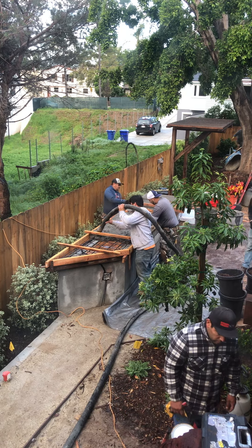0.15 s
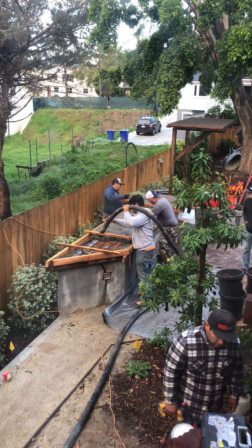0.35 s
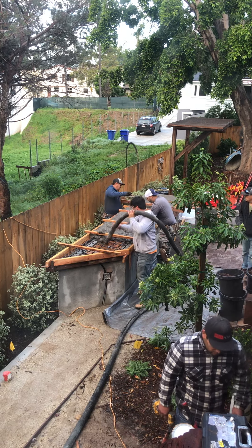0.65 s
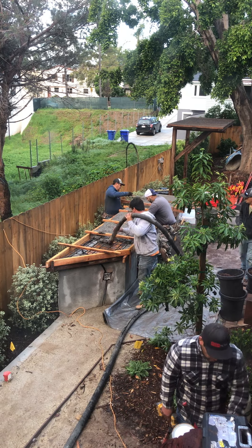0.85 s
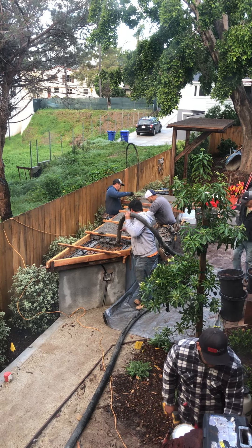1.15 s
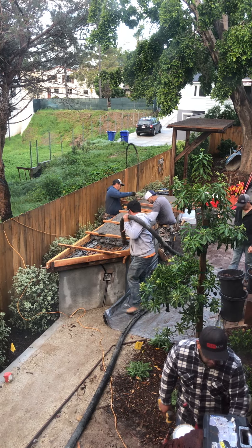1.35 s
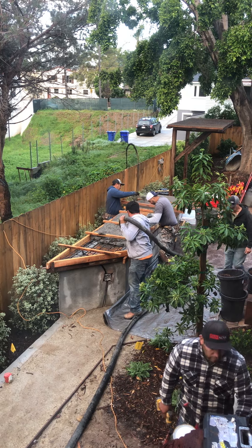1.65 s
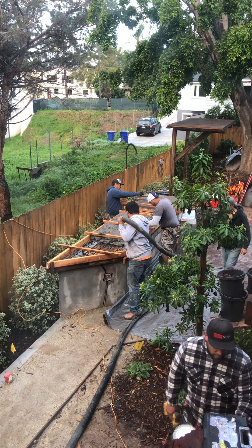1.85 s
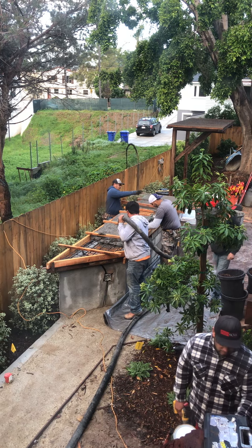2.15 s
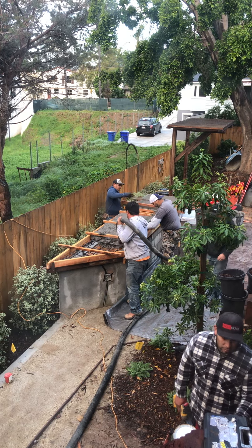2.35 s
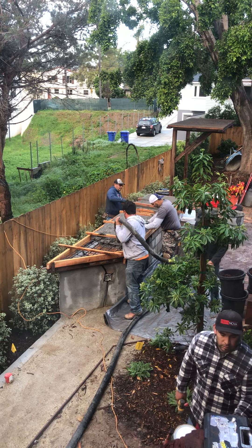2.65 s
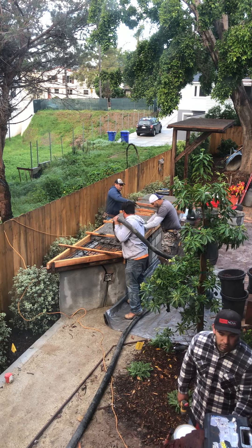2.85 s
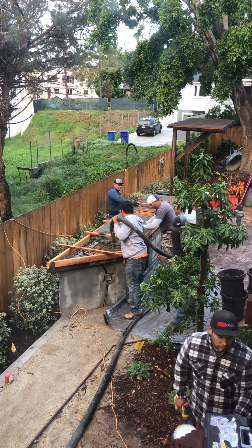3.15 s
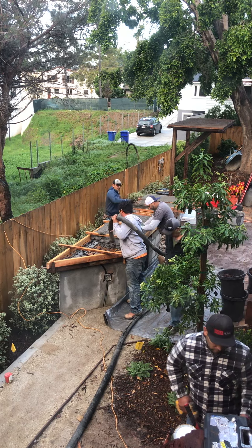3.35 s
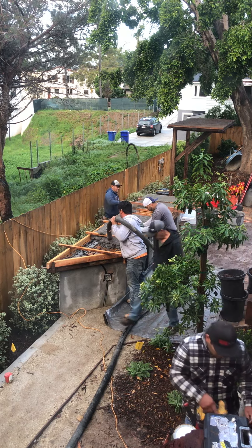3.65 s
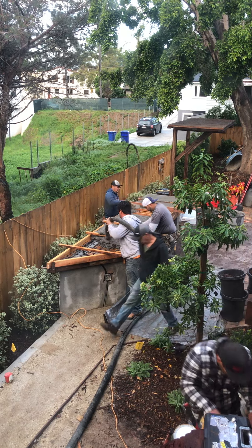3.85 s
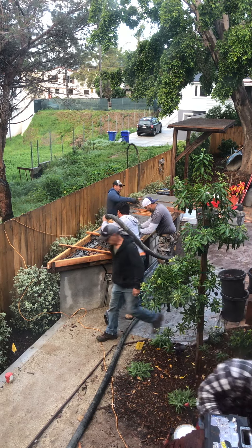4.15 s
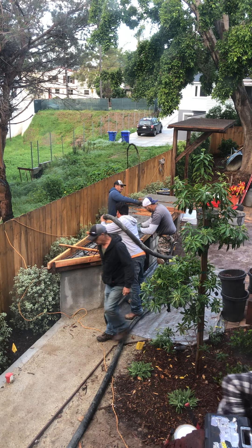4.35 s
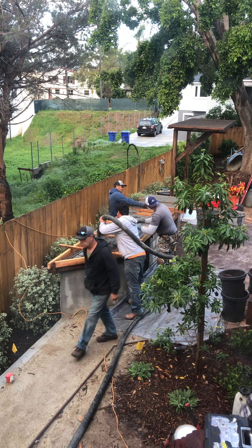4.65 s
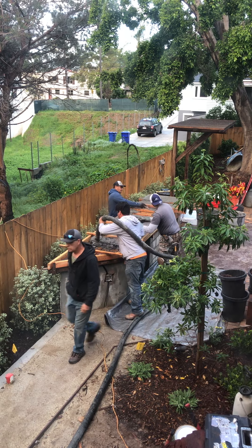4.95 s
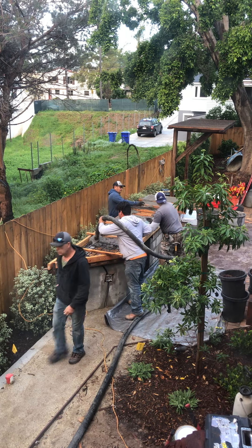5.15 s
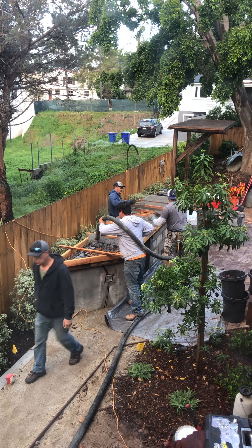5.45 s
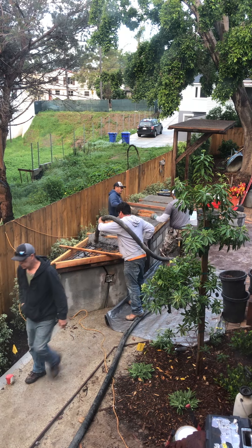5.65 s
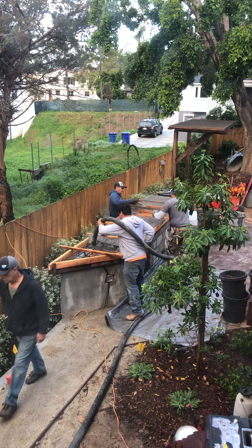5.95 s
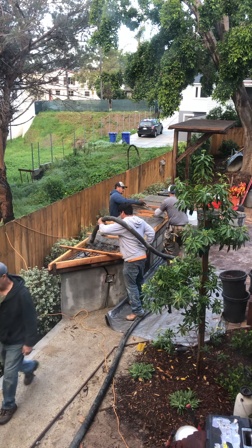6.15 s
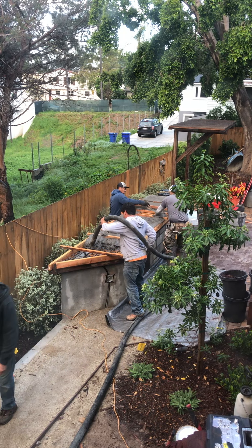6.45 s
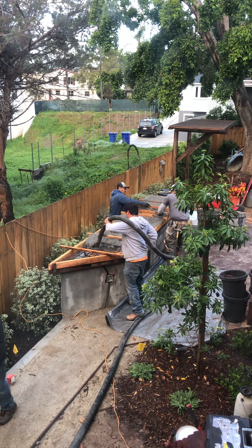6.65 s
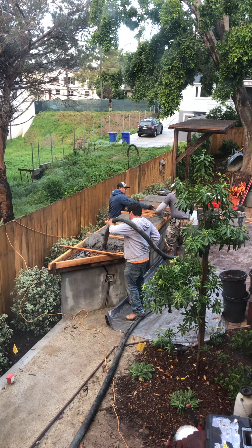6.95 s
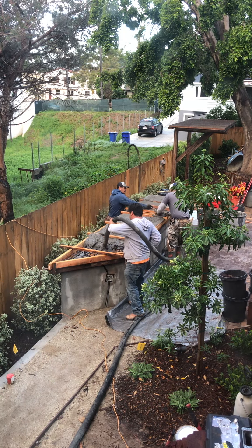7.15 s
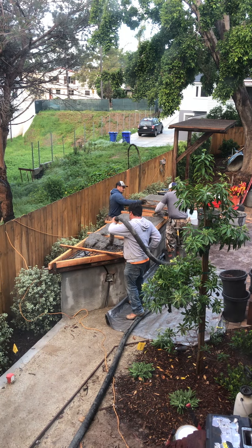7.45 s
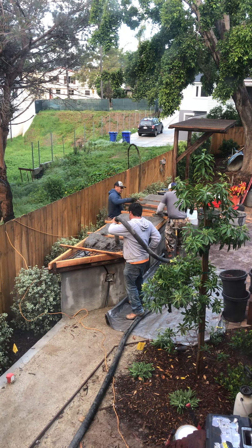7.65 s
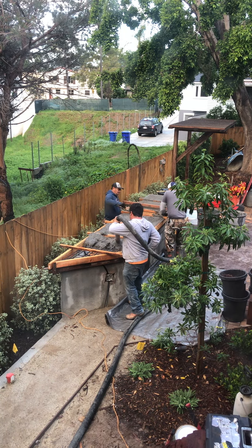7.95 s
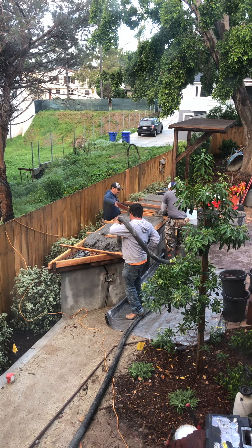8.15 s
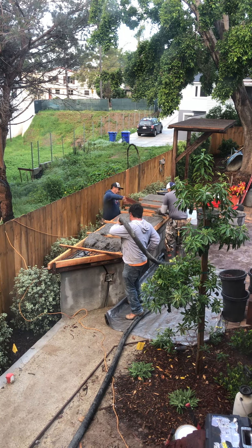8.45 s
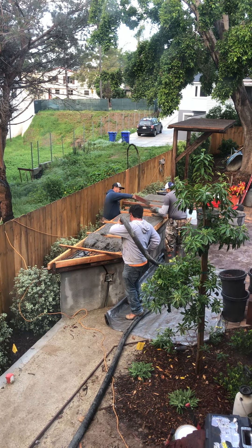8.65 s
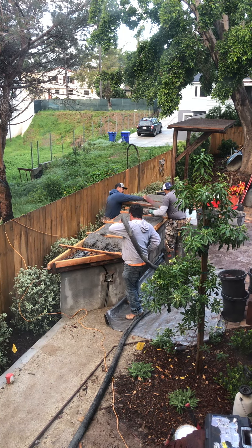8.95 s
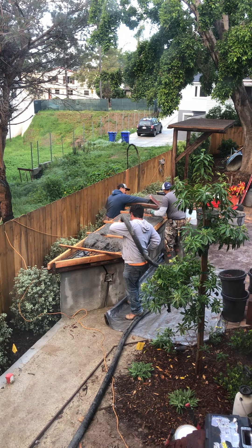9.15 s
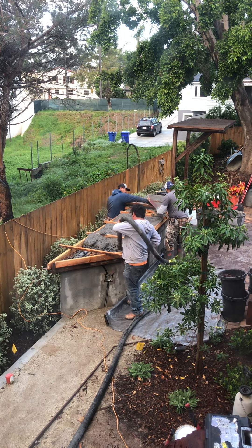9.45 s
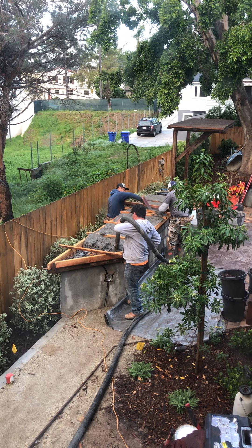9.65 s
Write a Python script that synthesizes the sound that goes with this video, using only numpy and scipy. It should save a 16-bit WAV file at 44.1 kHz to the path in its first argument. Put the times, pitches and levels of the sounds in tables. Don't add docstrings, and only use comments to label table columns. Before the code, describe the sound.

In a garden work site, a diesel concrete pump drones loudly with a second machine idling slightly lower, making a fast beating throb. Every 1.6 seconds the engine briefly races, the boom swells, a hydraulic whine rises and the clatter thins, then it settles. Loose metal chinks constantly. Tools knock and scuff early, and a steel rod bounces around three seconds. Phone microphone, mono, faint hiss.

```python
import sys
import numpy as np
from scipy import signal
from scipy.fft import rfft, irfft
from scipy.io import wavfile
from scipy.ndimage import uniform_filter1d, map_coordinates

SR = 44100
rng = np.random.default_rng(int(sys.argv[2]) if len(sys.argv) > 2 else 0)


def bounce(signal):
    frames = np.transpose(np.atleast_2d(signal))
    limited = np.clip(frames, -1, 1)
    pcm = np.round(limited * 32767).astype(np.int16)
    wavfile.write(sys.argv[1], SR, pcm)


def nominal_scale(level):
    x = np.asarray(level, float) / 20
    return 10 ** x


N = 432621

# start_s, settled_firing_hz, overspeed_hz
VALVE_CHANGES = [
    (-1.05, 74.52, 3),
    (.536, 74.917, 2.798),
    (2.13, 74.451, 3.065),
    (3.729, 74.929, 2.759),
    (5.327, 74.516, 3.014),
    (6.912, 74.915, 2.862),
    (8.509, 74.477, 3.005),
]
# lag_s, rise_s, fall_s, change_db
CLATTER_THINNING = [(0.15, 0.21, 0.38, -6), (0.097, 0.32, 0.49, -5)]


def unit(x):
    return x / np.sqrt(np.mean(x ** 2) + 1e-20)


def curves(rows):
    s, *columns = np.transpose(rows)
    return [np.interp(np.arange(N) / SR, s, column) for column in columns]


def wobble(rate):
    knots = rng.standard_normal(int(N * rate / SR) + 4)
    return map_coordinates(knots, [np.arange(N) * rate / SR])


def rush(spectrum, patchy_db):
    z = signal.stft(rng.standard_normal(N), nperseg=512)[2]
    patches = uniform_filter1d(rng.standard_normal(z.shape), size=7, axis=0)
    patches = uniform_filter1d(patches, size=14, axis=1)
    noise = signal.istft(z * nominal_scale(patchy_db * unit(patches)), nperseg=512)[1][:N]
    hz, db = np.transpose(spectrum)
    colour = nominal_scale(np.interp(np.log(np.fft.rfftfreq(N, 1 / SR) + 1), np.log(hz + 1), db))
    return unit(irfft(rfft(noise) * colour, N))


def tone(db, turns):
    return np.sqrt(2) * nominal_scale(db) * np.cos(2 * np.pi * turns)


def add(track, s, sound):
    part = track[round(s * SR):][:len(sound)]
    part += sound[:len(part)]


def swell(s, rise, fall):
    u = np.clip(s / rise, 0, 1)
    return u * u * (3 - 2 * u) * np.exp(-np.maximum(s - rise, 0) / fall)


def stroke_db(rows, extra_db=0):
    t = np.arange(N) / SR
    extra_db = extra_db + np.zeros(len(VALVE_CHANGES))
    total_db = np.zeros(N)
    for k, (start, _, _) in enumerate(VALVE_CHANGES):
        lag, rise, fall, change_db = rows[k % 2]
        total_db += (change_db + extra_db[k]) * swell(t - start - lag, rise, fall)
    return total_db


def pump_speed():
    race_s, settle_s = .265, .252
    t = np.arange(N) / SR
    starts, settled_hz, overspeed_hz = np.transpose(VALVE_CHANGES)
    k = np.searchsorted(starts, t, "right") - 1
    since = t - starts[k]
    before_hz = settled_hz[np.maximum(k - 1, 0)]
    glide_hz = (settled_hz[k] - before_hz) * np.clip(since / race_s, 0, 1)
    return before_hz + glide_hz + overspeed_hz[k] * swell(since, race_s, settle_s)


def exhaust(boom_db, firings, overspeed, surge, sway):
    boom = tone(boom_db, firings) + tone(-55 + 1.2 * sway[1], 2 * firings)
    return boom + overspeed * tone(-46.5, 2 * firings - .5 + .17 * surge)


def engine_orders(cycles, racing, overspeed, sway):
    # multiple_of_cycle, loaded_db, racing_db
    orders = [(3, -62, -57), (5, -65, -66), (6, -69, -79), (7, -56, -55), (9, -66.5, -92), (10, -74, -81),
              (11, -79, -67.5), (12, -72.5, -73), (13, -78.5, -91), (14, -65.5, -62), (15, -77, -73),
              (16, -86, -73.5), (17, -74, -68), (19, -76.5, -78), (20, -66.5, -77.5), (21, -80, -73),
              (22, -78, -80), (23, -76, -86), (28, -85, -75.5), (32, -68, -74), (33, -76, -76),
              (35, -80, -80.5), (37, -98, -77), (38, -84, -81), (40, -76, -101), (41, -72, -84),
              (43, -76.5, -83), (47, -75.5, -101), (52, -77, -92), (85.4, -80, -87)]
    out = tone(-80 + 9 * racing + 2.1 * sway[2], 2 * cycles)
    freed = np.maximum(racing, overspeed)
    for i, (multiple, load_db, race_db) in enumerate(orders):
        level_db = load_db + freed * (race_db - load_db) + 1.2 * sway[i % 6]
        drift = 0.011 * sway[(i + 3) % 6]
        out += tone(level_db, round(multiple) * cycles + rng.random() + drift)
    return out


def hydraulic_whine(cycles):
    # lag_s, rise_s, fall_s, change_db
    whine_swell = [(.17, 0.19, 0.16, 12.5), (.27, 0.17, 0.18, 8.5)]
    whine_extra = [0, 0, -0.21, 0.067, 0.38, 0, 2.2]
    # multiple_of_whine, level_db, resonance_hz, width_hz
    overtones = [(2, -66.5, 690, 13), (6, -78, 2012, 14), (6, -80, 2070, 14), (7, -77, 2376, 18)]
    steadiness = np.clip(1 - stroke_db(whine_swell) / 8, .2, 1)
    whine_db = -67.5 + stroke_db(whine_swell, whine_extra) + 1.5 * wobble(4.4) * steadiness
    pistons = 18 * cycles
    piston_hz = np.gradient(pistons) * SR
    rising = np.gradient(piston_hz) > 0
    out = tone(whine_db, pistons)
    for multiple, db, hz, width in overtones:
        near = 1 / (1 + ((multiple * piston_hz - hz) / width) ** 2)
        near *= np.where(rising, .45, 1)
        near = uniform_filter1d(near, size=2000)
        out += near * tone(db + 2.5 * wobble(6), multiple * pistons)
    return out


def clatter(firings, cycles):
    # pitch_hz, density_db (per Hz)
    roar_spectrum = [(220, -38), (380, -2.5), (398, -16), (481, -6.5), (554, -9), (575, -10), (591, -5.5),
                     (638, -6.5), (748, -2.5), (1490, -10), (1630, -9), (1920, -14.5), (2030, -10),
                     (2770, -9), (3600, -22), (4680, -51), (7920, -120)]
    # pitch_hz, density_db (per Hz)
    hiss_spectrum = [(1760, -20), (3000, -8.5), (3520, -5.5), (3770, -4.5), (4070, -4.5), (5150, -5.5),
                     (6470, -7), (8700, -14), (9300, -18), (11100, -22.5), (15700, -29)]
    top_leads_s, top_from_hz = .07, 7500
    clatter_db = -67 + stroke_db(CLATTER_THINNING)
    chop = 1 + 0.032 * np.cos(2 * np.pi * firings)
    chop += 0.048 * np.cos(np.pi * firings) + 0.017 * np.cos(2 * np.pi * cycles)
    shared_db = 0.13 * wobble(3.5)
    roar_db = -60 + 0.68 * (clatter_db + 67) + shared_db
    roar = nominal_scale(roar_db) * chop * rush(roar_spectrum, patchy_db=0.76)
    hiss = chop ** 0.45 * rush(hiss_spectrum, patchy_db=0.77)
    hz = np.fft.rfftfreq(N, 1 / SR) + 1
    top = irfft(rfft(hiss) / (1 + (top_from_hz / hz) ** 8), N)
    early_db = np.interp(np.arange(N) + top_leads_s * SR, np.arange(N), clatter_db)
    return roar + nominal_scale(3.5 + shared_db) * (nominal_scale(clatter_db) * (hiss - top) + nominal_scale(early_db) * top)


def rumble(racing):
    # pitch_hz, density_db (per Hz)
    rumble_spectrum = [(22, -48), (32, -27), (42, -27), (55, -3.5), (85, -10.5), (110, -4.5), (160, -3.5),
                       (190, -9.5), (230, -9.5), (300, -13.5), (450, -21.5), (600, -24.5), (900, -120)]
    level_db = -56.0 + 0.81 * racing + 0.66 * wobble(2.8)
    return nominal_scale(level_db) * rush(rumble_spectrum, patchy_db=.5)


def pump():
    # lag_s, rise_s, fall_s, change_db
    boom_swell = [(.04, .27, .19, 7), (.05, .29, 0.25, 7)]
    boom_db = -40.5 + stroke_db(boom_swell) + .4 * wobble(4)
    speed = pump_speed()
    firings = np.cumsum(speed) / SR + .442
    racing = np.clip((boom_db + 40.0) / 3, 0, 1)
    overspeed = np.clip((speed - 75.35) / 2.2, 0, 1)
    lag = 1 / (.2 * SR)
    surge = signal.lfilter([lag], [1, lag - 1], np.clip(speed - 75.1, 0, 3))
    cycles = (firings - .07 * surge) / 4
    sway = [wobble(3.146) for _ in range(6)]
    tones = exhaust(boom_db, firings, overspeed, surge, sway) + engine_orders(cycles, racing, overspeed, sway)
    return tones + hydraulic_whine(cycles) + clatter(firings, cycles) + rumble(racing)


def idler():
    # start_s, exhaust_db, fan_db
    levels = [(0, -51, -80), (.9, -50, -63), (3.6, -51, -63), (4.8, -48, -63), (6.1, -50.5, -62),
              (7.5, -48.5, -65.5), (8.2, -51, -62), (9.1, -50.5, -73), (9.81, -53, -74)]
    # start_s, firing_hz
    idle_speed = [(0.0, 70.44), (0.65, 69.96), (1.31, 69.62), (1.96, 69.58), (2.62, 69.9), (3.27, 69.7),
                  (3.92, 69.94), (4.58, 68.53), (5.23, 69.46), (5.89, 69.99), (6.54, 69.77), (7.19, 68.76),
                  (7.85, 70.77), (8.5, 71.03), (9.16, 71.41), (9.81, 70.61)]
    exhaust_db, fan_db = curves(levels)
    firings = np.cumsum(curves(idle_speed)[0]) / SR + .015
    uneven = tone(exhaust_db - 18.5 + 3.8 * wobble(4.2), 1.5 * firings)
    fan = tone(fan_db + 1.6 * wobble(2.7), 3.467 * firings)
    return tone(exhaust_db, firings) + uneven + fan


def chinks(count, hz, db):
    out, t = np.zeros(N), np.arange(SR // 40) / SR
    envelope = nominal_scale(-60 * t / 0.012) * (1 - np.exp(-t / .002))
    for when, pitch, size in rng.random((count, 3)):
        ring = np.sin(2 * np.pi * hz * (0.97 + .24 * pitch) * t) * envelope
        add(out, when * N / SR, nominal_scale(db - 2.5 * np.log(size + .08)) * ring)
    return out * nominal_scale(1.3 * (stroke_db(CLATTER_THINNING) - 2.0) + 2.5 * wobble(6.2))


def scuffs():
    # peak_s, level_db (rms), length_s, centre_hz
    scrapes = [(.009, -66, .003, 12000), (.1125, -63, 0.0033, 3500), (.1125, -66, .003, 9000),
               (.131, -74, .003, 15000), (.151, -74, .004, 12000), (.272, -58, 0.015, 4000),
               (.273, -71, .014, 12000), (.354, -64, .003, 8000), (.413, -58, .002, 14000),
               (1.13, -64, 0.051, 2780), (1.6, -77, .04, 11000), (1.602, -54.5, 0.13, 228),
               (2.39, -56.5, 0.044, 845), (2.391, -58.5, 0.048, 2500), (2.389, -60, .012, 850),
               (2.375, -79, .09, 10000), (1.125, -66, 0.1, 4600), (1.125, -75, .09, 7500),
               (1.578, -66, 0.088, 2800), (0.439, -65, 0.086, 2620), (0.646, -72, 0.053, 2700),
               (4.717, -67, 0.18, 2690), (6.414, -65, 0.1, 2700), (9.324, -76, .004, 14000),
               (9.347, -73, .006, 14000), (9.355, -75, .003, 14000)]
    out, t = np.zeros(N), np.arange(SR // 2) / SR
    for s, db, length, hz in scrapes:
        band = signal.butter(2, [hz / 1.38, min(hz * 1.3, 17e3)], "bandpass", fs=SR, output="sos")
        early = min(s, .2)
        envelope = np.exp(-((t - early) / (length / 2)) ** 2)
        grit = unit(signal.sosfilt(band, rng.standard_normal(len(t))))
        add(out, s - early, nominal_scale(db) * envelope * grit)
    return out


def knocks():
    # start_s, peak_db, ring_hz, t60_s
    blows = [(.1116, -42, 1570, 0.016), (.121, -52, 1750, .03), (.148, -57, 3800, 0.037),
             (.142, -54, 2750, .03), (.4284, -55, 2420, 0.059), (.421, -60, 3850, .1),
             (.436, -63, 3850, .1), (.4594, -53, 2650, .05), (0.791, -54, 2700, .05),
             (.815, -55, 3800, 0.044), (1.119, -56, 2680, 0.077), (3.185, -55, 2680, 0.066),
             (8.3589, -48, 2080, 0.049), (8.464, -55, 1580, .03), (9.6, -59, 2750, .08),
             (9.655, -55.5, 2740, .06), (9.69, -57, 2700, .05)]
    out, t = np.zeros(N), np.arange(SR // 2) / SR
    for s, db, hz, t60 in blows:
        ring = np.sin(2 * np.pi * hz * t) + 0.33 * np.sin(2 * np.pi * 1.1 * hz * t)
        rough = unit(uniform_filter1d(rng.standard_normal(len(t)), size=60))
        ring = ring * (1 + 0.26 * rough)
        add(out, s, nominal_scale(db + 1 - 60 * t / t60) * (1 - np.exp(-t / 0.00055)) * ring)
    return out


def bouncing_rod():
    # pitch_hz, level_db, t60_s
    modes = [(4393, -62, .35), (4590, -58.5, .12), (11550, -73.5, .25)]
    # start_s, lower_mode_db, upper_mode_db
    bounces = [
        (3.034, 3.5, 0.0),
        (3.105, -5, -4),
        (3.134, -4, -14),
        (3.155, -1, -16),
    ]
    caught_s = 3.222
    out, t = np.zeros(N), np.arange(SR // 2) / SR
    for s, lower_db, upper_db in bounces:
        blow = (lower_db, upper_db, 4 * upper_db)
        for (hz, db, t60), blow_db in zip(modes, blow):
            add(out, s, nominal_scale(db + blow_db - 60 * t / t60) * np.sin(2 * np.pi * hz * (s + t)))
    return out * np.clip((caught_s - np.arange(N) / SR) / .008, 0, 1)


def background():
    # pitch_hz, density_db (per Hz)
    floor_spectrum = [(2000, -120), (5000, -5), (9000, -1.5), (16000, 2.5)]
    return nominal_scale(-82.5) * rush(floor_spectrum, patchy_db=1.0)


def scene():
    machines = pump() + idler() + chinks(count=900, hz=2730, db=-63.0)
    tools = scuffs() + knocks() + bouncing_rod()
    return (machines + tools + background())[None]


def roll_off(x):
    return signal.sosfilt(signal.butter(12, 16300, fs=SR, output="sos"), x)


def record(dry):
    top_hz = 15770
    limited = irfft(rfft(dry) * (np.fft.rfftfreq(N, 1 / SR) < top_hz), N)
    return roll_off(limited)


dry = scene()
out = record(dry)
bounce(out)
```